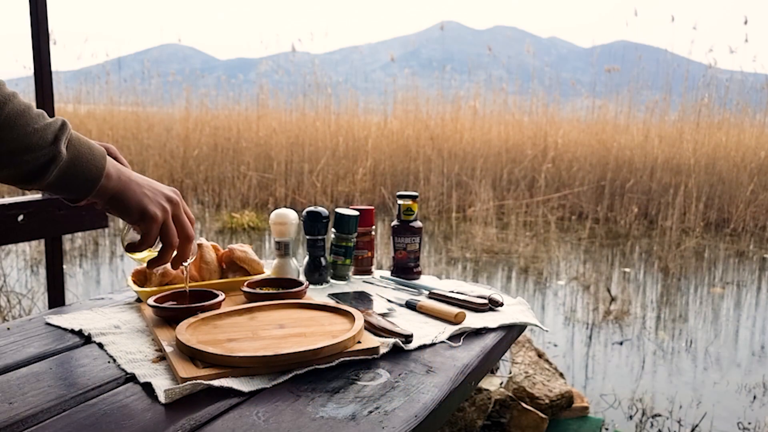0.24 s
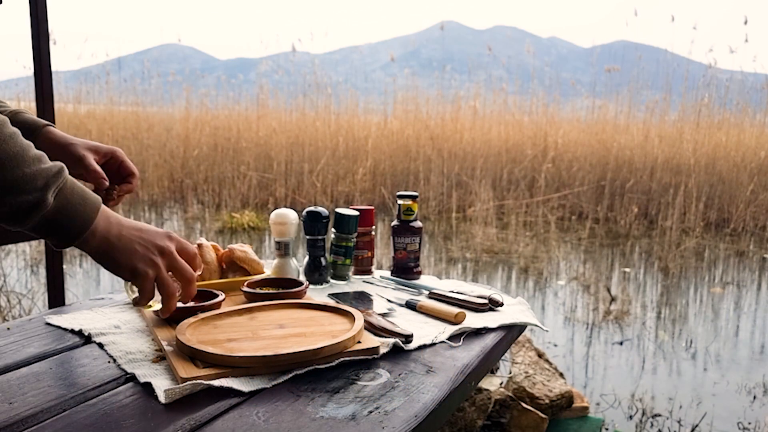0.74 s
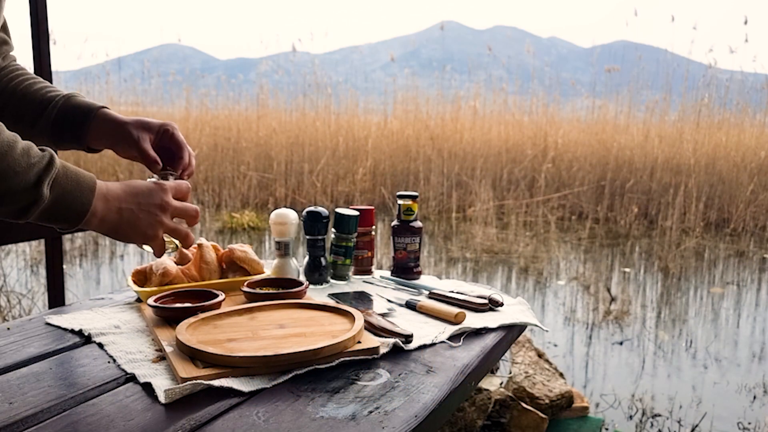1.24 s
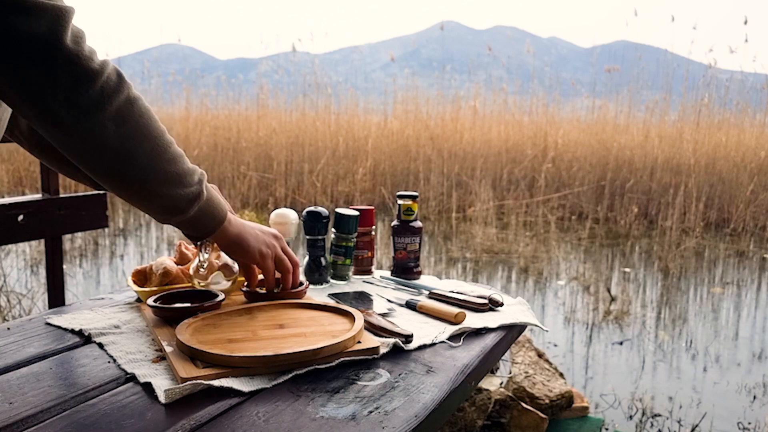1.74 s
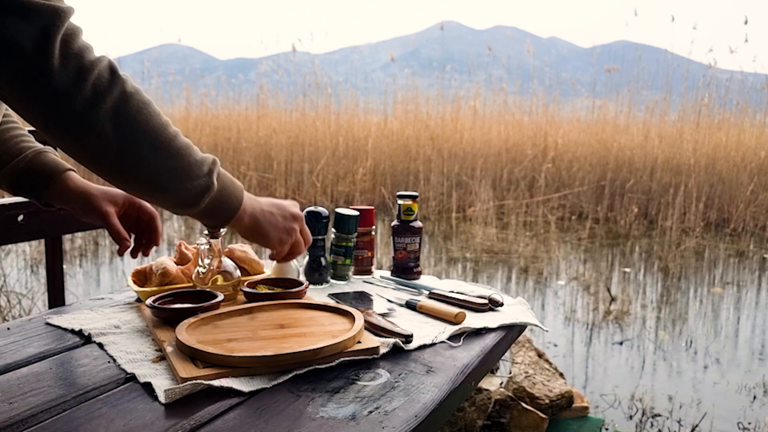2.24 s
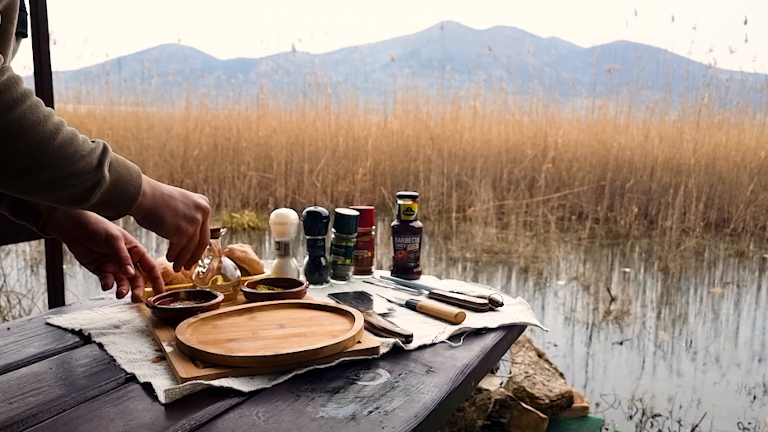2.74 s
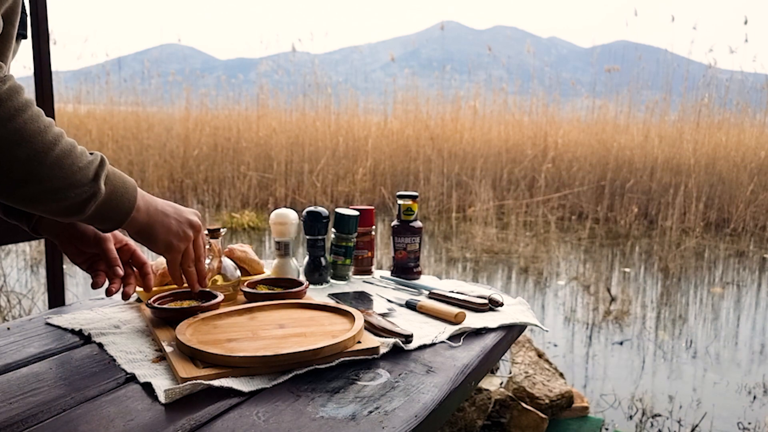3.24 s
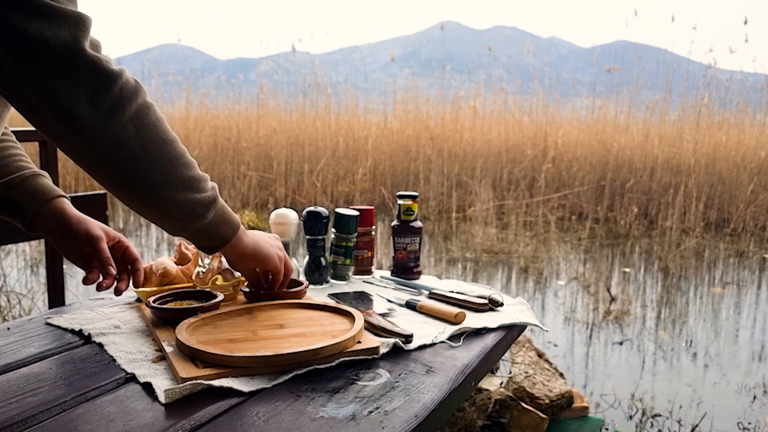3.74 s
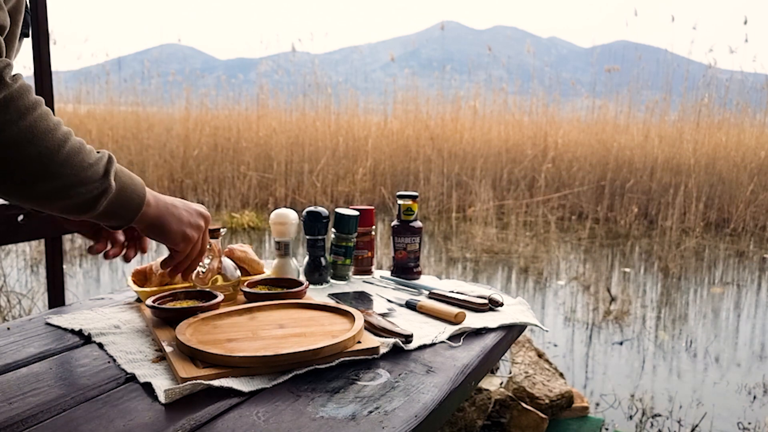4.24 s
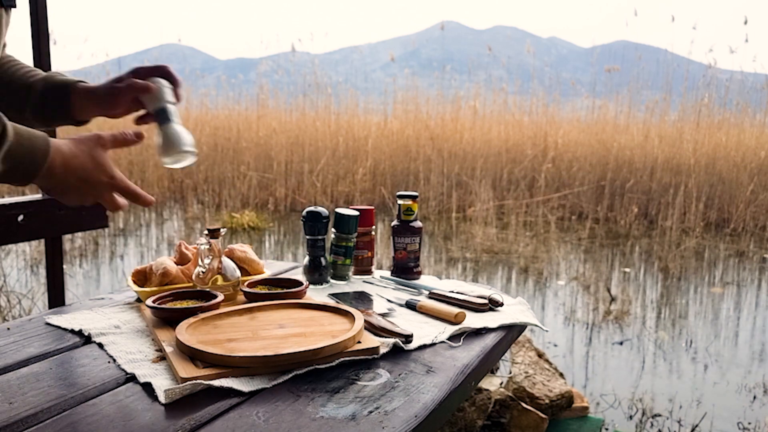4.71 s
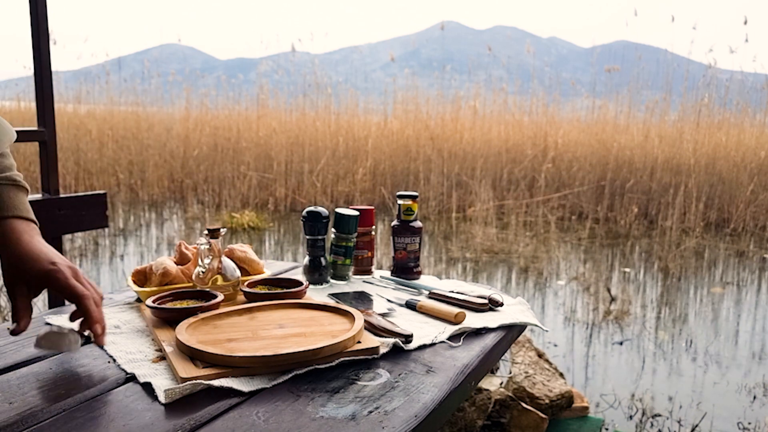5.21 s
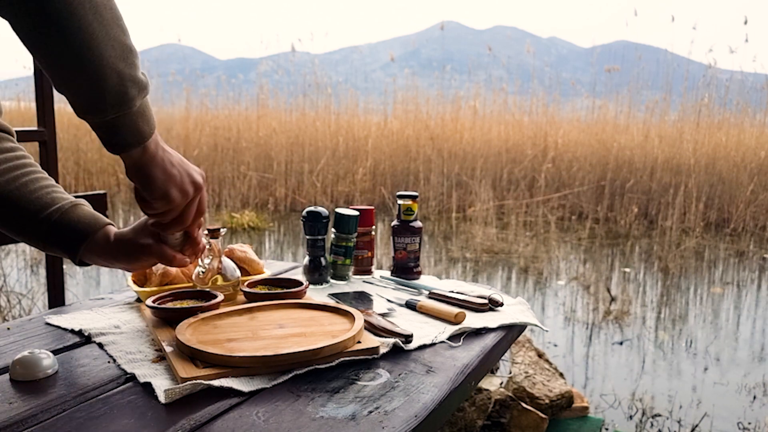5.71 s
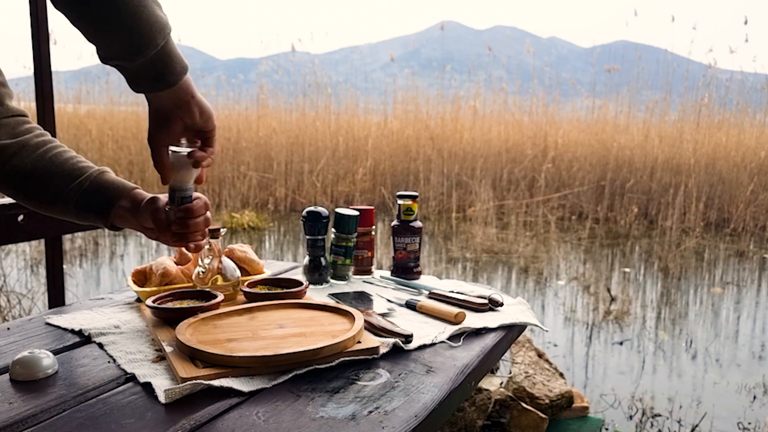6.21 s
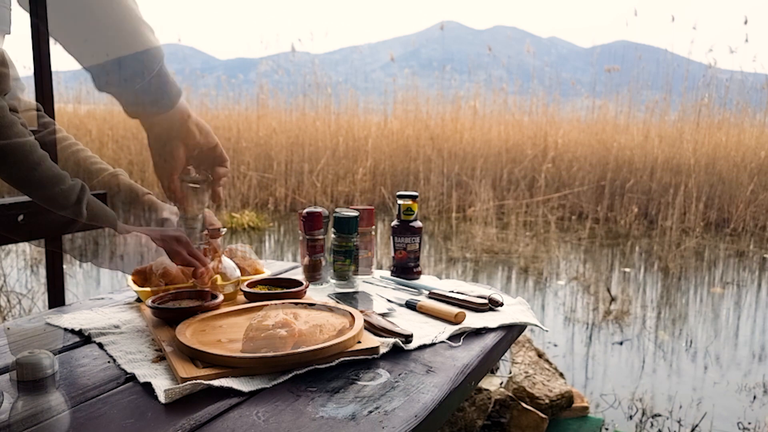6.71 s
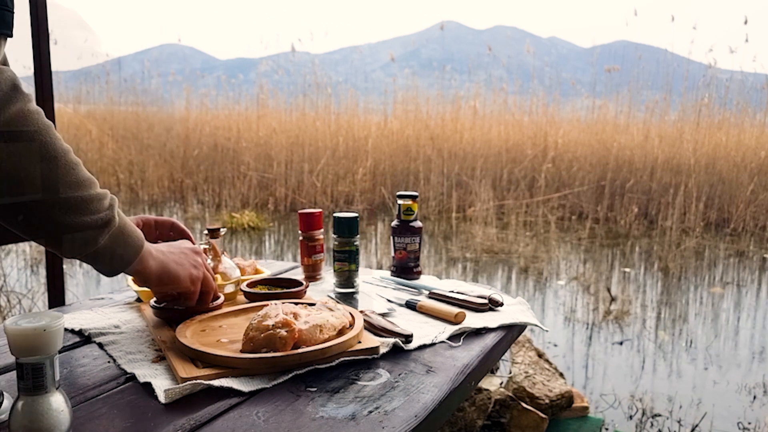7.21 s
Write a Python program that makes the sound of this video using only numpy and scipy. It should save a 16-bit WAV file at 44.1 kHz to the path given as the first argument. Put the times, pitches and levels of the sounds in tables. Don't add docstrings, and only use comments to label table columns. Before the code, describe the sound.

Quiet outdoor table setting: light taps and ticks, glass bouncing onto wood, plastic cap popped and dropped, five gritty grinder twists, faint sizzle at the end.

```python
import sys
import numpy as np
from scipy import signal
from scipy.fft import rfft, irfft, next_fast_len
from scipy.io import wavfile
from scipy.ndimage import uniform_filter1d, map_coordinates

SR = 44100
rng = np.random.default_rng(int(sys.argv[2]) if len(sys.argv) > 2 else 0)


def int16_out(signal):
    q = np.round(np.clip(np.atleast_2d(signal).T, -1, 1) * 32767)
    wavfile.write(sys.argv[1], SR, q.astype(np.int16))


def to_linear_factor(level_db):
    exponent = np.asarray(level_db, float) / 20
    return 10 ** exponent


N = 328986
CUTS_S, CUT_FADE_S = (0.101, 6.73), .004


def unit(x):
    return x / np.sqrt(np.mean(x ** 2) + 1e-20)


def along(points, hz):
    f, v = np.transpose(points)
    return np.interp(np.log(hz + 1), np.log(f + 1), v)


def curves(rows):
    s, *cols = np.transpose(rows)
    return [np.interp(np.arange(N) / SR, s, c) for c in cols]


def by_place(values):
    rows = []
    for k, s in enumerate(CUTS_S):
        rows.append((s - CUT_FADE_S / 2, values[k]))
        rows.append((s + CUT_FADE_S / 2, values[k + 1]))
    return curves(rows)[0]


def wobble(rate_hz):
    knots = rng.standard_normal(int(N * rate_hz / SR) + 4)
    return map_coordinates(knots, [np.arange(N) * rate_hz / SR])


def filtered(x, response):
    m = next_fast_len(x.shape[-1] + 2048)
    return irfft(rfft(x, m) * response(np.fft.rfftfreq(m, 1 / SR)), m)[..., :x.shape[-1]]


def shaped(x, points):
    return unit(filtered(x, lambda hz: to_linear_factor(along(points, hz))))


def resonances(peaks):
    def response(f):
        total = 0
        for k, (hz, width, db) in enumerate(peaks):
            total = total + (-1) ** k * to_linear_factor(db) * 1j * f * width / (hz * hz - f * f + 1j * f * width)
        return total
    return response


def ringing(modes, t, rise_s):
    total = 0
    for k, (hz, db, t60_s) in enumerate(modes):
        total = total + (-1) ** k * to_linear_factor(db - 60 * t / t60_s) * np.sin(2 * np.pi * hz * t)
    return total * (1 - np.exp(-t / rise_s)) ** 2


def blow(t, contact_s, t60_s, tail):
    rise = 1 - np.exp(-t / max(contact_s, 5e-5))
    decay = to_linear_factor(-60 * t / (.002 + 7 * contact_s)) + tail * to_linear_factor(-60 * t / t60_s)
    snap = (t == 0) * 0.00093 / max(contact_s, 1e-4)
    return rise * decay * rng.standard_normal(len(t)) + snap


def add(out, x, s, pan_db=0):
    part = out[:, round(s * SR):][:, :len(x)]
    part += to_linear_factor([[pan_db / 2], [-pan_db / 2]]) * x[:part.shape[1]]


def rush(gain, patchy_db):
    # (frequency [Hz], correlation [-1..1])
    alike = [(60, 0.047), (130, 0.92), (290, 0.61), (640, 0.8), (1410, 0.41), (3100, -0.31), (6820, 0.19),
             (15000, -0.22)]
    hz, t, z = signal.stft(rng.standard_normal((2, N + 512)), SR, nperseg=256)
    field = uniform_filter1d(uniform_filter1d(rng.standard_normal(z.shape[1:]), 4, 0), 8, 1)
    turn = np.arccos(np.clip(along(alike, hz), -1, 1))[:, None] / 2
    z = z * gain(hz[:, None], t) * to_linear_factor(patchy_db * unit(field)) * [np.cos(turn), np.sin(turn)]
    mid, side = signal.istft(z, nperseg=256)[1][:, :N]
    return unit(np.array([mid + side, mid - side]))


def from_left(x, lead_s):
    bounce_gain, bounce_s = .22, np.array([[.00031], [.00044]])

    def response(hz):
        bounce = (1 + bounce_gain * np.exp(-2j * np.pi * hz * bounce_s)) / np.hypot(1, bounce_gain)
        return bounce * np.exp(1j * np.pi * hz * lead_s * np.array([[1], [-1]]))
    return filtered(x, response)


def rustle():
    # (frequency [Hz], density [dB per Hz])
    cloth = [(180, -32), (300, -4.5), (2930, -5.5), (5160, -22), (7440, -16.5), (10000, -40), (12900, -17),
             (16000, -22)]
    level_db, fade_db_per_s = -58, 16
    t = np.arange(round(CUTS_S[0] * SR)) / SR
    noise = shaped(rng.standard_normal(len(t)) + 1.4 * rng.standard_normal((2, len(t))), cloth)
    return np.pad(to_linear_factor(level_db - fade_db_per_s * t) * noise, ((0, 0), (0, N - len(t))))


def lakeside():
    # (frequency [Hz], density [dB per Hz])
    rumble = [(32, -33), (55, -11.5), (70, -7.5), (145, -1), (270, -17), (300, -30), (390, -54),
              (660, -120)]
    buffet = [(12, -21), (22, -1.5), (45, 7), (80, -42)]
    lapping = [(120, -38.5), (200, -1.5), (450, 3), (750, -3.5), (1100, -26.5)]
    breeze = [(410, -29.5), (700, -10.5), (798, -6.5), (1280, -8.5), (2150, -4.5), (3330, -7), (4200, -13),
              (6000, -62.5)]
    food = [(3820, -31.5), (6500, -6), (7120, -7), (7760, -9), (15100, -23), (16000, -10.5)]
    # (time [s], wind strength [dB])
    gusts = [(.1, 6), (.2, -1), (.24, 14.5), (.45, 2.5), (.7, -2.5), (2.1, 2), (2.55, -1), (4.4, 0),
             (5.5, 1.5), (6.2, -1), (6.7, 3), (6.75, 6)]
    air_db = (-72, -74, -69.5)
    chorus_hz = (4800, 4790, 5400)

    def moving(points, patchy_db):
        return shaped(rush(lambda hz, t: 1 + 0 * hz, patchy_db), points)

    gust_db, = curves(gusts)
    wind = to_linear_factor(by_place((-68, -77, -77)) + gust_db + 2.2 * wobble(5.5)) * moving(rumble, 1.6)
    wind += to_linear_factor(-86.5 + gust_db + 5.7 * wobble(5.4)) * moving(buffet, 2.3)
    water = to_linear_factor(by_place((-72, -83, -76)) + 0.71 * gust_db + 0.45 * wobble(34)) * moving(lapping, 2.6)
    air = to_linear_factor(by_place(air_db) + 0.31 * gust_db + 0.83 * wobble(19)) * moving(breeze, 4.1)
    hiss = to_linear_factor(by_place((-80, -83, -71)) + 2.2 * wobble(17)) * moving(food, 1.3)

    centre_hz = by_place(chorus_hz)

    def band(hz, t):
        return np.exp(-((hz - np.interp(t, np.arange(N) / SR, centre_hz)) / 900) ** 2) + 0.056

    grainy = unit(rush(band, 1.2) * to_linear_factor(1.8 * wobble(160)))
    chorus = to_linear_factor(by_place((-69.5, -67, -62.5)) + 0.22 * wobble(2.27)) * grainy
    return wind + water + air + hiss + chorus


def reeds():
    size_db = 4.5 * np.minimum(rng.exponential(size=(2, N)), 2.5)
    stalks = (rng.random((2, N)) < 14 / SR) * to_linear_factor(size_db)
    tick = rng.standard_normal(SR // 100) * to_linear_factor(-60 * np.arange(SR // 100) / SR / 0.0086)
    ticks = signal.fftconvolve(stalks, tick[None], axes=1)[:, :N]
    return to_linear_factor(-67.0) * filtered(ticks, resonances([(7040, 8500, 0)]))


def soft_blows():
    # (time [s], peak [dB], ring [Hz], t60 [s], rise [s])
    blows = [(0, -58, 2930, .06, .002), (0.002, -58, 95, 0.13, .006), (.058, -48.5, 90.5, 0.11, 0.01),
             (.07, -59, 2930, .03, .002), (0.225, -55, 151.3, 0.21, 0.017),
             (0.266, -47.5, 144, 0.055, 0.0033), (0.301, -52, 142, 0.095, 0.0094),
             (.385, -61.5, 153, 0.086, .006), (1.79, -45.5, 144.6, 0.2, 0.0052),
             (1.841, -34, 1112, 0.062, 0.0048), (1.892, -53, 1120, 0.054, 0.004),
             (1.936, -50, 184, 0.06, 0.002), (1.936, -46, 584, 0.025, 0.002),
             (1.939, -65.5, 2140, 0.073, .003), (1.9465, -47, 620, .025, .0015),
             (1.947, -45.5, 262, 0.056, 0.0024), (1.957, -53, 165, .16, .004),
             (2.325, -59, 1880, .06, .006), (4.822, -28, 151, 0.071, 0.016),
             (5.0043, -27, 480, 0.011, 0.0012), (5.0455, -54, 1870, .04, .003),
             (7.372, -54.5, 339, 0.068, 0.0033)]
    out, t = np.zeros((2, N)), np.arange(SR // 4) / SR
    for s, db, hz, t60_s, rise_s in blows:
        add(out, to_linear_factor(db + 6.5) * ringing([(hz, 0, t60_s)], t, max(rise_s, 1e-4)), s)
    return out


def small_things():
    # (time [s], peak [dB], ring [Hz])
    taps = [(0.207, -47.5, 1850), (0.23, -45.5, 2810), (3.503, -61, 2040), (3.69, -66, 860),
            (6.995, -47.5, 2690), (7.381, -55, 890), (0.573, -53.5, 1610), (0.938, -52.5, 3340),
            (1.268, -49, 2200), (1.325, -59, 1970), (1.358, -56, 2240), (1.694, -50.5, 2380),
            (2.062, -60, 794), (2.315, -52.5, 2250), (2.062, -59, 1240), (2.015, -63, 2450),
            (2.638, -50.5, 3500), (2.769, -57, 2110), (3.657, -51.5, 1970), (3.74, -51.5, 1560),
            (3.847, -59.5, 780), (4.142, -53.5, 3520), (4.197, -48.5, 1970), (4.545, -50.5, 1890),
            (4.794, -52, 3800), (5.229, -57, 3900), (5.478, -50.5, 2030), (6.274, -51.5, 1760),
            (6.426, -55.5, 2130), (6.832, -47, 1214), (6.954, -48, 2500), (7.367, -47, 1750),
            (7.375, -39, 1710)]
    clicks = [(0.001, -50, 4270), (.1, -60, 5140), (.174, -58.5, 4900), (2.155, -53, 4470),
              (2.175, -59, 4900), (3.708, -58, 5450), (0.2154, -56, 4550), (0.271, -52, 5700),
              (0.396, -54, 4500), (0.446, -50.5, 4140), (0.589, -55, 6800), (0.707, -51.5, 5900),
              (0.8504, -56, 4900), (1.3582, -51.5, 5000), (1.51, -47.5, 5630), (1.5502, -45.5, 5750),
              (2.292, -61, 4860), (2.328, -50.5, 4020), (3.511, -58, 5840), (3.548, -57.5, 5000),
              (5.065, -58, 4900), (2.132, -50.5, 4270), (2.533, -56, 5330), (3.033, -52, 4650),
              (3.3036, -59, 4800), (3.592, -50.5, 7700), (3.7527, -49.5, 6140), (4.1392, -54, 4790),
              (4.35, -45, 5860), (6.2736, -53, 4860), (6.8584, -48.5, 5870), (6.989, -47, 4840),
              (7.181, -54, 5900), (7.207, -51, 5800), (7.355, -49.5, 7300)]
    ticks = [(0.189, -57, 8700), (5.032, -49, 15000), (3.726, -68, 9900), (0.4958, -59, 13300),
             (0.8101, -46, 14700), (0.91, -51.5, 11200), (1.214, -51, 14500), (1.553, -56, 8730),
             (1.5768, -63, 11300), (1.7, -55, 13700), (2.2747, -51.5, 10300), (2.354, -53.5, 11300),
             (3.543, -61, 8900), (3.726, -67, 14900), (7.313, -59, 9450), (2.4733, -57.5, 12100),
             (3.131, -41.5, 14860), (3.234, -46, 8900), (3.7259, -51, 7780), (3.753, -50.5, 11460),
             (4.2143, -62, 15000), (4.475, -61, 9700), (4.808, -41, 15500), (4.8403, -53, 8730),
             (5.035, -59, 10300), (5.509, -56, 8470), (5.6784, -66, 11750), (5.946, -58, 14300),
             (6.536, -48, 15300), (6.7242, -55, 11300), (6.776, -41, 14600), (6.9117, -54, 10570),
             (7.367, -47.5, 9200)]
    # (width [share of pitch], crack [dB], trim [dB], t60 [s])
    kinds = [
        (.14, -13.5, 3.5, 0.04),
        (0.094, -33, 2.5, 0.036),
        (0.084, -23.5, 6, 0.025),
    ]
    out, t = np.zeros((2, N)), np.arange(SR // 16) / SR
    for rows, (breadth, crack_db, trim_db, t60_s) in zip([taps, clicks, ticks], kinds):
        for s, db, hz in rows:
            puff = rng.standard_normal(len(t)) * to_linear_factor(-60 * t / max(t60_s, .01)) * (1 - np.exp(-t / .0006))
            narrow = resonances([(hz, breadth * hz, 0)])
            broad = resonances([(hz, 1.3 * hz, 0)])
            ring = filtered(puff, lambda f: narrow(f) ** 2 + to_linear_factor(crack_db) * broad(f) ** 2)
            add(out, to_linear_factor(db + trim_db) * ring / np.abs(ring).max(), s - .001, .8)
    return out


def glass_on_board():
    # (time [s], crack [dB], glass ring [dB], board knock [dB])
    rattle = [
        (1.786, -48, -45, -60),
        (1.7913, -14, -19, -38),
        (1.8025, -46, -80, -56),
        (1.8098, -21, -23.5, -42),
        (1.8195, -25, -80, -44),
        (1.8257, -34, -80, -48),
        (1.8328, -31, -80, -37),
        (1.836, -29, -80, -37),
        (1.8445, -46, -80, -46),
        (1.8735, -70, -80, -52),
    ]
    # (frequency [Hz], level [dB], t60 [s])
    glass = [(3870, 0, .1), (3978, -4, .09), (7526, -30, .04), (9420, -17, .07), (9505, -11, .08),
             (11150, -29, .05), (11890, -30, .07), (12010, -26, .07)]
    board = [(311, -15.5, 0.13), (385, -16, 0.13), (486, -2, 0.013), (747, -10.5, 0.2), (1090, -5.5, 0.047),
             (1470, 5, 0.015), (1690, -20, 0.025), (2167, -7, 0.051), (2280, -8, 0.062),
             (3460, -42, 0.0264)]
    glass_lag_s, ring_floor_db = .001, -50
    out, t = np.zeros((2, N)), np.arange(SR // 4) / SR
    glass_hits_s = np.array([s for s, _, ring_db, _ in rattle if ring_db > ring_floor_db] + [9])
    clatter = resonances([(656, 950, 4.5), (2130, 1200, 4.5), (4950, 840, 4.0), (8000, 2900, -13.5)])
    for s, crack_db, ring_db, knock_db in rattle:
        flight_s = glass_hits_s[glass_hits_s > s][0] - s
        push = -np.cos(2 * np.pi * 3300 * t) * to_linear_factor(-60 * t / 0.0021) * (1 - np.exp(-t * SR))
        push = filtered(push, lambda f: 1.3 / (1 + 1j * f / 7000) ** 2)
        choke = to_linear_factor(-60 * np.maximum(t - flight_s, 0) / 0.0035)
        ring = choke * ringing(glass, np.maximum(t - glass_lag_s, 0), .0004)
        noise = rng.standard_normal(len(t)) * to_linear_factor(-60 * t / .025)
        wood = ringing(board, t, .0003) + 3 * filtered(noise, clatter)
        add(out, to_linear_factor(crack_db) * push + to_linear_factor(ring_db - 1.5) * ring + to_linear_factor(knock_db) * wood, s, -1.5)
    return out


def cap():
    # (time [s], peak [dB], contact [s], t60 [s], pitch [factor])
    scrapes = [
        (4.5943, -22.5, 0.0021, 0.12, 0.99),
        (4.598, -19, 0.0013, 0.089, 1.008),
        (4.602, -16.5, 0.00043, 0.1, 1.034),
        (4.628, -25.5, 0.00082, 0.039, 1.22),
    ]
    # (time [s], peak [dB], contact [s], dullness [0-1], cavity [Hz])
    hits = [(5.0002, -40, .001, .5, 3000), (5.0042, -31, .0005, .6, 2850), (5.0068, -31, .0005, .6, 3330),
            (5.01, -36, .001, .5, 3330), (5.244, -52, .006, .3, 3000), (5.251, -42, .005, .3, 3000),
            (5.2583, -6, .0002, .1, 2000), (5.2613, -24, .0006, .05, 2000),
            (5.2634, -2.5, .00015, .1, 2000), (5.2665, -17, .0003, .15, 2000),
            (5.2692, -22, .0004, .15, 2500), (5.2765, -29, .0006, .3, 2700), (5.286, -24, .0004, .3, 1700),
            (5.296, -37, .002, .5, 1500), (5.313, -34, .001, .5, 3300), (5.3165, -29, .001, .7, 2490),
            (5.3185, -24, .0004, .7, 2490), (5.327, -35, .001, .7, 2150), (5.3562, -21.5, .0007, .85, 2840),
            (5.3625, -34, .0004, .85, 2950), (5.385, -30, .0012, .95, 2550),
            (5.4075, -32, .0015, .95, 2250), (5.4238, -25, .00015, .8, 2160), (5.437, -44, .002, .9, 2000)]
    # (frequency [Hz], width [Hz], level [dB])
    neck = [(2425, 180, 2), (4560, 420, 16), (5700, 1670, 10), (8240, 600, 13.5), (10300, 1300, 0.5),
            (13300, 1900, 4.5)]
    bright = [(320, 41, -12), (958, 440, -16.5), (1970, 900, -16), (2980, 500, -8), (3460, 73, 5),
              (3860, 120, 11), (4270, 580, -1.5), (4660, 59, 10), (5180, 600, -2.5), (7200, 1100, -4),
              (10240, 1700, -11), (14000, 4000, -16)]
    flat = [(1081, 300, -6.5), (1630, 430, -3.5), (3520, 630, -2), (4630, 160, 7), (6960, 780, -0.5),
            (8130, 1200, -6), (10300, 620, -6.5), (13300, 3600, -17)]
    out, pull, t = np.zeros((2, N)), np.zeros((2, N)), np.arange(SR // 10) / SR

    broad = resonances([(1700, 1500, -16), (8000, 11000, -14)])
    for s, db, contact_s, t60_s, pitch in scrapes:
        def body(f):
            return (resonances(neck)(f / pitch) + broad(f)) / (1 + (f / 15300) ** 16)
        ring = filtered(blow(t, contact_s, t60_s, 0.13), body)
        add(pull, to_linear_factor(db) * ring / np.abs(ring).max(), s, -.4)

    for s, db, contact_s, dull, cavity_hz in hits:
        shell = sorted(flat + [(cavity_hz, 260, 10)])

        def body(f):
            mixed = (1 - dull) * resonances(bright)(f) + dull * resonances(shell)(f)
            return mixed * (1j * f / (1j * f + 260)) ** 2 / (1 + (f / 15500) ** 8)
        ring = filtered(blow(t, contact_s, 0.061, 0.15), body)
        add(out, to_linear_factor(db) * ring / np.abs(ring).max(), s, 0)

    roll_s, length_s, roll_db, roll_hz = 5.405, .05, -53, 13500
    whisper = rng.standard_normal((2, round(length_s * SR)))
    n = whisper.shape[1]
    whisper = unit(filtered(whisper, lambda f: resonances([(roll_hz, 4000, 0)])(f) ** 2))
    out[:, round(roll_s * SR):][:, :n] += to_linear_factor(roll_db) * np.hanning(n) * whisper
    return from_left(pull, 6.5e-5) + from_left(out, 0.00011)


def salt_mill():
    # (frequency [Hz], density [dB per Hz])
    grains = [(2650, -52.5), (4500, -5.5), (6100, -5), (7220, 0.5), (13200, -3), (15600, 4), (15950, -32),
              (16500, -50)]
    mill = [(710, -53), (1200, 9), (1820, -6.5), (2400, 0.5), (3360, -2.5), (4900, -15.5), (6000, -35),
            (13200, -90)]
    # (ring [Hz], ring [dB], body over grind [dB])
    twists = [
        (10300, -24, -17.5),
        (13100, -4, -14),
        (7740, 5, -16.5),
        (12000, -5.5, -10.5),
        (11800, 3, -8),
    ]
    # (time [s], grind [dB])
    efforts = [
        [(5.551, -46), (5.558, -39), (5.568, -44), (5.574, -36.5), (5.6, -42), (5.615, -39.5), (5.632, -50),
         (5.65, -45.5), (5.662, -69)],
        [(5.705, -70), (5.732, -59), (5.735, -50), (5.75, -44.5), (5.762, -49), (5.772, -55.5), (5.792, -68)],
        [(5.843, -51), (5.847, -54), (5.858, -45), (5.893, -42), (5.902, -45), (5.912, -60), (5.932, -73)],
        [(6.122, -52), (6.13, -43), (6.148, -39), (6.162, -45), (6.19, -46), (6.202, -43.5), (6.222, -84)],
        [(6.604, -59), (6.61, -43.5), (6.625, -56.5), (6.655, -46.5), (6.67, -45.5), (6.681, -48), (6.693, -40),
         (6.71, -57), (6.735, -68)],
    ]
    # (time [s], peak [dB], ring [Hz], body over crack [dB])
    crystals = [(5.5552, -28, 9000, -19), (5.5584, -23, 9600, -21), (5.5722, -25, 11500, -10),
                (5.5757, -28, 12000, -19), (5.5954, -21, 8800, -21), (5.5998, -30, 9800, -14),
                (5.6087, -21, 15000, -18), (5.6115, -27, 12600, -17), (5.6175, -27, 9900, -15),
                (5.6227, -28, 13400, -18), (5.6305, -28, 8400, -21), (5.6328, -32, 9600, -19),
                (5.6372, -31, 8800, -21), (5.646, -29, 14500, -24), (5.6482, -31, 10800, -24),
                (5.7336, -35, 9500, -11), (5.7375, -29, 9300, -22), (5.7457, -24, 13000, -24),
                (5.7483, -20, 12300, -30), (5.7519, -21, 10900, -26), (5.7574, -28, 11000, -22),
                (5.7605, -20, 12000, -25), (5.8459, -35, 8200, -8), (5.8502, -30, 8200, -18),
                (5.8577, -21, 13900, -20), (5.8627, -25, 12600, -21), (5.8653, -26, 10700, -22),
                (5.8701, -27, 8200, -16), (5.8789, -23, 8700, -12), (5.8858, -24, 7500, -25),
                (5.892, -16, 9300, -29), (5.8972, -21, 9500, -16), (6.1234, -21, 13300, -17),
                (6.1261, -32, 10200, -18), (6.147, -26, 14500, -19), (6.1557, -26, 12200, -13),
                (6.1818, -22, 12500, -17), (6.1872, -30, 11600, -17), (6.1968, -28, 10500, -7),
                (6.607, -25, 11000, -14), (6.6093, -29, 11300, -13), (6.6299, -29, 11300, -19),
                (6.641, -30, 11700, -21), (6.6509, -32, 10500, -19), (6.6614, -32, 12000, -13),
                (6.6673, -29, 11600, -10), (6.6703, -25, 12400, -12), (6.6743, -28, 12900, -12),
                (6.6884, -25, 12000, -17), (6.6936, -24, 11000, -8),
                (5.5736, -25, 12300, -18), (5.589, -29, 11000, -8), (6.1355, -30, 12500, -10),
                     (6.1455, -25, 14000, -19), (6.15, -27, 15000, -20), (6.1525, -30, 11500, -20),
                     (6.166, -31, 12000, -20), (6.1795, -33, 11000, -3), (6.6125, -33, 11500, -10),
                     (6.6195, -35, 11300, -18), (6.6657, -28, 12500, -18), (6.698, -31, 12000, -14),
                     (6.7247, -41, 11500, -20)]
    cracks = crystals
    body, sound = np.zeros(N), np.zeros((2, N))

    breaks = (rng.random(N) < 2200 / SR) * to_linear_factor(3 * np.minimum(rng.exponential(size=N), 1.8))
    shatter = to_linear_factor(-60 * np.arange(SR // 50) / SR / .0035)
    swarm = unit(unit(signal.fftconvolve(breaks, shatter)[:N]) + 0.4)

    def tone(points, apart):
        return shaped(rng.standard_normal(N) + apart * rng.standard_normal((2, N)), points)

    salt = tone(grains, 0.97)
    for (ring_hz, ring_db, body_db), effort in zip(twists, efforts):
        span = slice(round(effort[0][0] * SR), round(effort[-1][0] * SR))
        grind = to_linear_factor(curves(effort)[0][span]) * swarm[span]
        ring = resonances([(ring_hz, .2 * ring_hz, ring_db)])
        sound[:, span] += filtered(grind * salt[:, span], lambda f: (f > 3600) * (1 + ring(f)))
        body[span] += to_linear_factor(body_db) * grind

    for s, db, hz, body_db in cracks:
        luck = rng.standard_normal(len(shatter))
        ring = resonances([(hz, .25 * hz, 0)])
        chip = filtered((1.2 + luck) * shatter ** 2, lambda f: to_linear_factor(along(grains, f)) * (0.086 + ring(f)))
        add(sound, to_linear_factor(db - .5) * chip / np.abs(chip).max(), s - .0001)
        body[round((s - .0004) * SR):][:len(shatter)] += to_linear_factor(db + body_db - 1.0) * np.sqrt(shatter)
    both = sound + to_linear_factor(1.0) * body * tone(mill, 0.45)
    return filtered(both, lambda hz: 1 / (1 + (2000 / (hz + 1)) ** 16))


def porch(x):
    # (frequency [Hz], t60 [s])
    decay = [(300, 0.15), (3000, 0.078), (12000, 0.012)]
    hz, t, z = signal.stft(rng.standard_normal((2, SR // 4)), SR, nperseg=128)
    tail = signal.istft(z * to_linear_factor(-60 * t / along(decay, hz)[:, None]), SR, nperseg=128)[1]
    late = np.pad(x, ((0, 0), (40, 0)))
    return signal.fftconvolve(late, tail / np.linalg.norm(tail[0]), axes=1)[:, :N]


def scene():
    around = rustle() + lakeside() + reeds()
    glass = from_left(soft_blows() + glass_on_board(), 6.8e-5)
    near = from_left(small_things(), 0.0001652) + cap() + from_left(salt_mill(), 7.6e-5)
    echo = porch(to_linear_factor(-10) * near + to_linear_factor(-14) * glass)
    echo = filtered(echo, lambda hz: 1j * hz / (1j * hz + 500))
    return near + glass + echo + around


def low_pass(x):
    return signal.sosfilt(signal.butter(12, 17150, fs=SR, output="sos"), x)


def record(dry):
    hz, t, z = signal.stft(dry, SR, nperseg=1024)
    edges_hz = [12900, 13600, 14300, 15100, 16000, 16900, SR]
    gates_db = [-105.5, -106, -106.5, -106, -64, 0]
    for low_hz, high_hz, gate_db in zip(edges_hz, edges_hz[1:], gates_db):
        band = (hz >= low_hz) & (hz < high_hz)
        power = np.mean(np.abs(z[:, band]) ** 2, axis=(0, 1))
        z[:, band] *= power > to_linear_factor(2 * gate_db - 6 * (t > 5.45))
    mix = signal.istft(z, nperseg=1024)[1][:, :N]
    return low_pass(mix)


dry = scene()
out = record(dry)
int16_out(out)
```